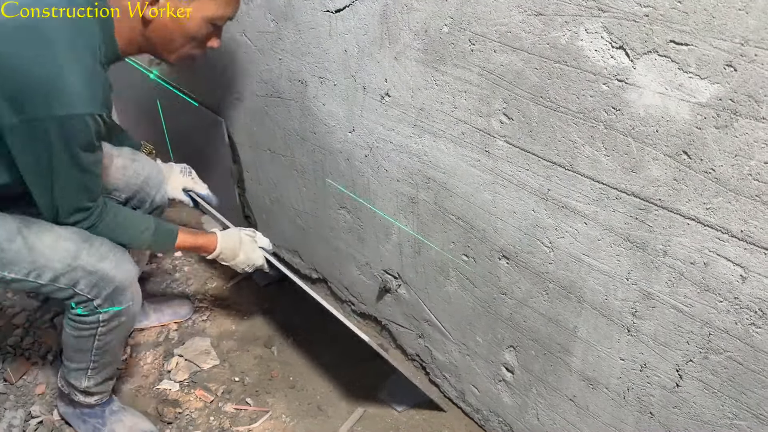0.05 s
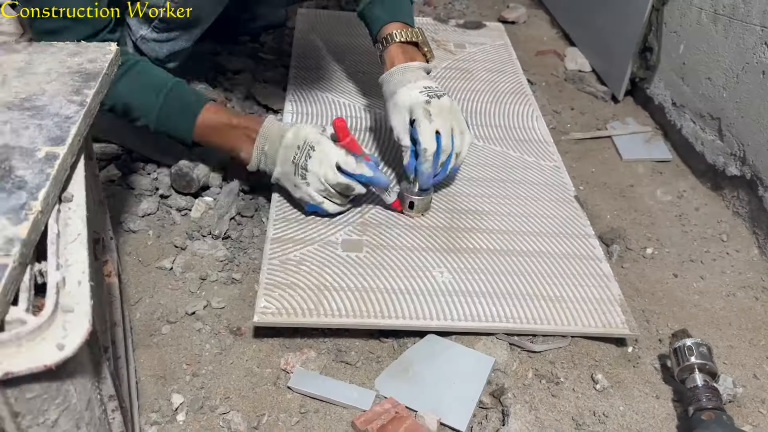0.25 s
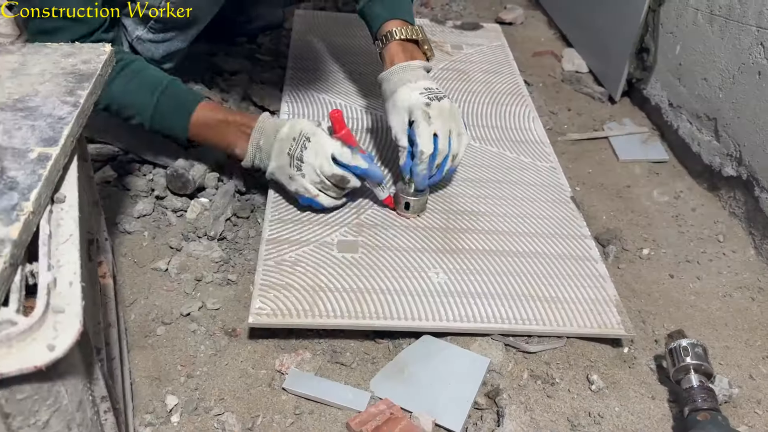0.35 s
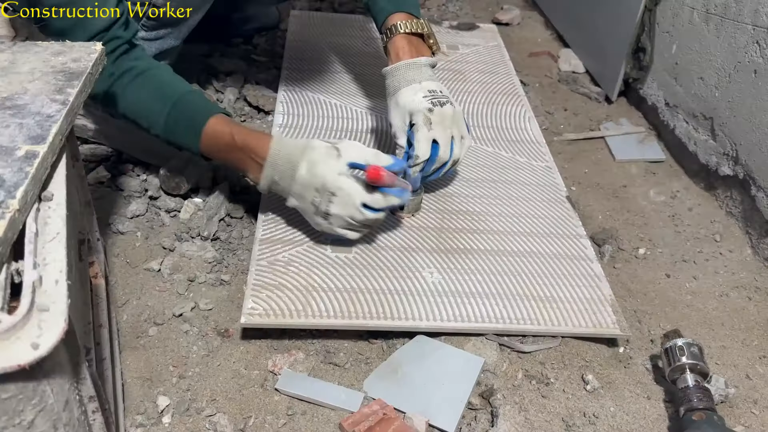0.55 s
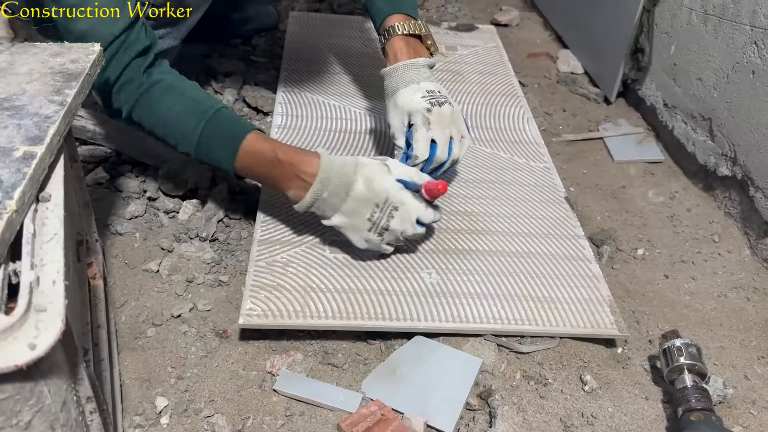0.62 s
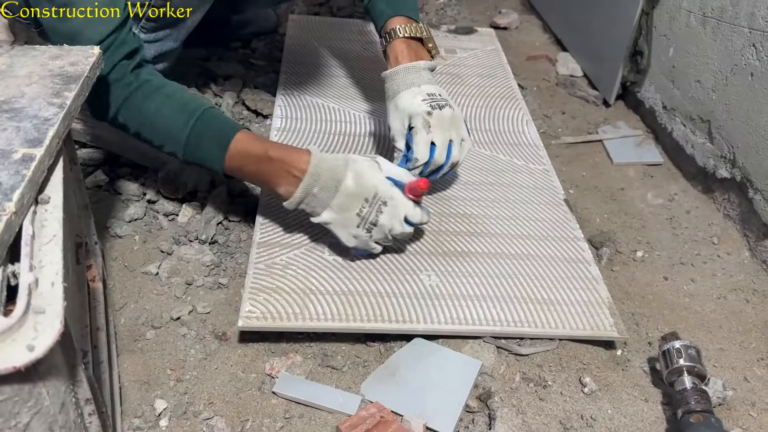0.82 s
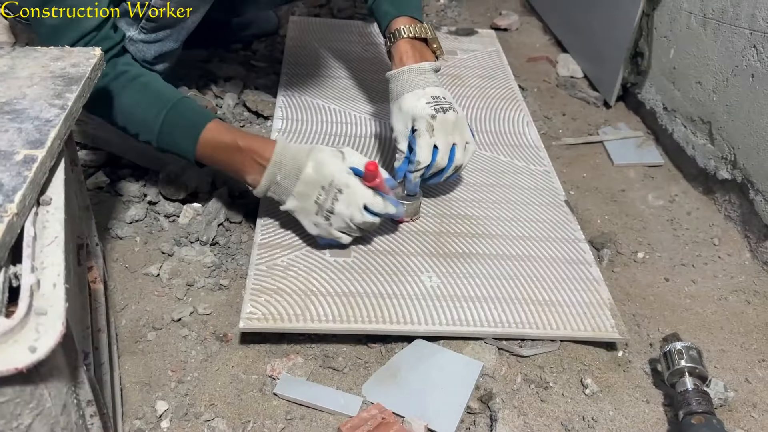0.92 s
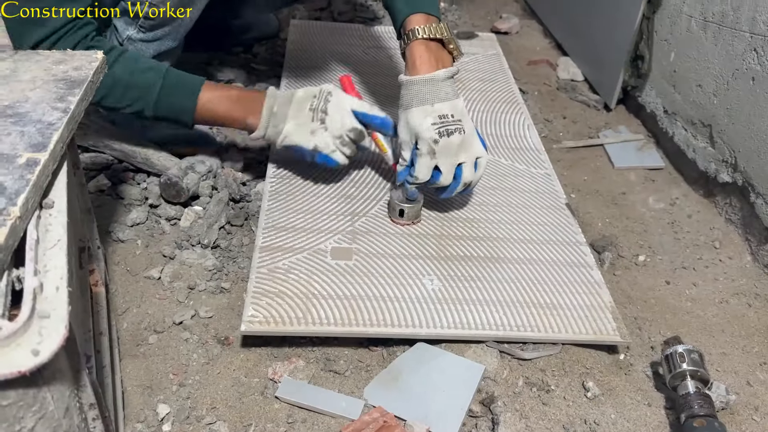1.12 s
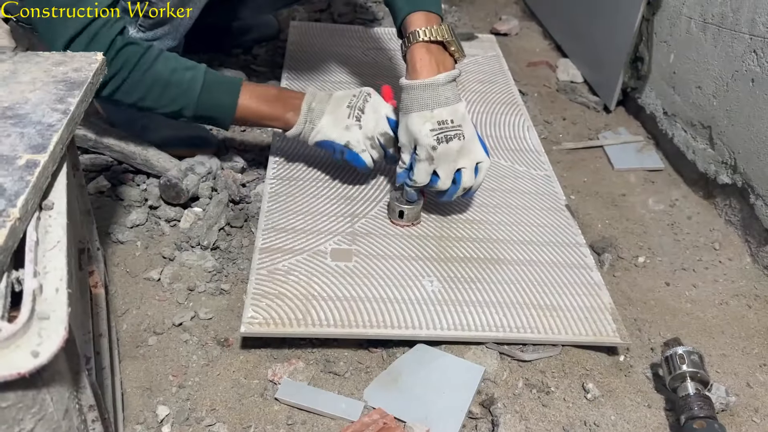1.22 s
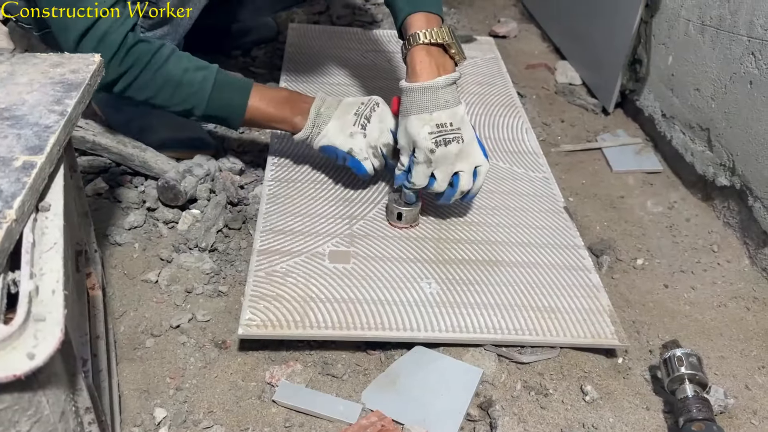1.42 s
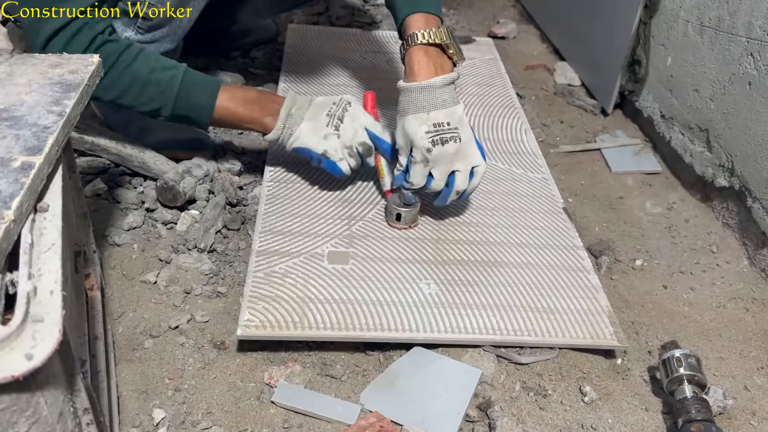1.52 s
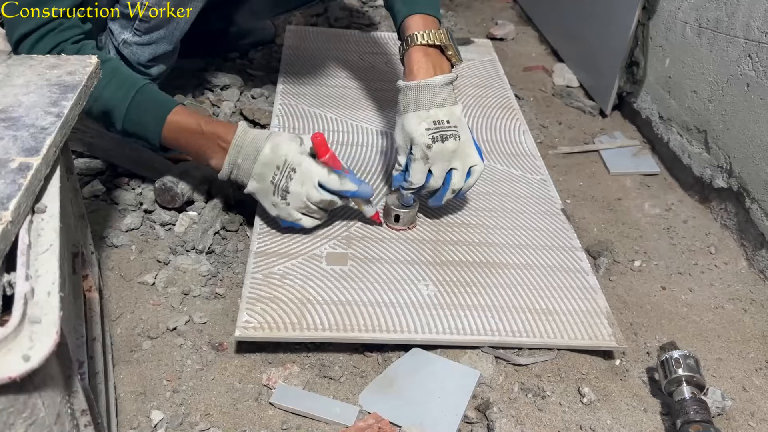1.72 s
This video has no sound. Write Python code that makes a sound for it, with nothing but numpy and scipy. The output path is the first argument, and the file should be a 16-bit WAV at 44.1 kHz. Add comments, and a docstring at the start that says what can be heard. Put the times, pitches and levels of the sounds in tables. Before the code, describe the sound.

A tile lands with a hollow knock, then a hand tool scratches it in squeaky strokes.

```python
"""Over the low rumble of a building site, a large ceramic tile slides on grit; at 0.2 s it is set down
on hard ground, and the impacts excite its normal modes in a hollow, ringing knock. A brief near-silence
follows. From 0.34 s a small hand tool is scraped over the lying tile: stick-slip friction rings tile
and tool, at times squeaking, and near concrete walls answer. Two hard strokes come at about 1.3 and
1.4 s, and a few light ones end the scene."""
import sys
import numpy as np
from scipy import signal
from scipy.fft import rfft, irfft, next_fast_len
from scipy.io import wavfile

SR = 44100
rng = np.random.default_rng(int(sys.argv[2]) if len(sys.argv) > 2 else 0)


def output_pcm(signal):
    """Save a mono or channel-first signal as 16-bit PCM at the path in sys.argv[1].

    Samples are clipped to [-1, 1] before scaling.
    """
    pcm = np.clip(np.atleast_2d(signal).T, -1, 1) * 32767
    wavfile.write(sys.argv[1], SR, np.round(pcm).astype(np.int16))


N = 77175

# Spectra below give relative level per unit bandwidth.
# spectra of the site's rumble and of its faint hush (f/Hz, level/dB)
RUMBLE_SPECTRUM = [(20, -17), (45, -5), (85, 0.5), (115, -1.5), (170, -17.5), (400, -31.5), (1500, -54)]
HUSH_SPECTRUM = [(30, -10), (230, 1), (450, -4), (900, -10.5), (1400, -10), (3000, -15), (6000, -23.5),
                 (9000, -39), (11000, -47), (15000, -45.5)]
# their envelopes; the rumble swells around the hard strokes (t/s, level/dB)
RUMBLE_ENVELOPE = [(0, -65), (.4, -56.5), (.48, -56.5), (.58, -58.5), (.67, -51.5), (.8, -64), (1.1, -60),
                   (1.3, -51.5), (1.38, -50.5), (1.435, -40.5), (1.5, -51.5), (1.56, -45.5), (1.61, -59.5),
                   (1.75, -72)]
HUSH_ENVELOPE = [(0, -60.5), (.35, -57.5), (.6, -64.5), (.95, -58), (1.1, -62.5), (1.22, -66.5), (1.4, -63),
                 (1.75, -57.5)]
# stereo width of the site: the rumble is more central than the hush (f/Hz, side gain/dB)
SITE_WIDTH = [(30, 0), (90, -6.5), (250, 0.5), (2000, -1.5)]
# spectrum of the grinding grit (f/Hz, level/dB)
GRIT_SPECTRUM = [(60, -15), (260, -5), (500, -7.5), (900, -6.5), (1400, 0), (2500, -4), (4000, -7),
                 (6300, -13), (8000, -24), (9300, -28), (11000, -30), (15000, -13.5)]
# envelope of the edge sliding over it (t/s, level/dB)
SLIDE_ENVELOPE = [(0, -49), (.04, -49), (.1, -53), (.155, -54.5), (.174, -45.5), (.192, -41), (.215, -40.5),
                  (.26, -56)]
# grains snapping under the edge (t/s, level/dB, f/Hz, bandwidth/Hz, T60/s)
GRIT_SNAPS = [(.169, -39, 3900, 500, 0.064), (0.1786, -42.5, 4000, 1500, .04),
              (0.185, -31.5, 1320, 350, 0.047), (0.197, -30.5, 3520, 1410, 0.056)]
# normal modes of the tile held on its edge (f/Hz, relative level/dB, T60/s)
TILE_MODES = [(203, -13, 0.49), (242.2, -3.5, 0.23), (287.3, -4, 0.29), (313, -4.5, .35), (386, 0.5, 0.18),
              (533.5, -0.5, 0.18), (626, 0, 0.35), (733, -8.5, .2), (776, -8, 0.11), (1148, 1, 0.11),
              (1316, -3.5, 0.16), (1379, 4.5, 0.1), (1527, -3.5, .15), (1853, -5.5, 0.17), (2286, -6, .12)]
# impacts as the edge lands and rocks (t/s, relative level/dB, cutoff f/Hz, crunch gain/dB)
IMPACTS = [(0.1983, -14.5, 5960, 12), (0.2051, -1.5, 1690, 0.5), (0.2145, -9.5, 1190, 6.5),
           (0.2454, -18.5, 804, 1)]
# spectrum of the crunch, the dense ringing of tile, ground and wall (f/Hz, level/dB)
CRUNCH_SPECTRUM = [(50, -21), (130, -10.5), (230, 1), (420, 3), (900, -6.5), (1350, 1), (1700, -7.5),
                   (2200, -2), (2600, -9), (4000, -12.5), (5200, -25.5), (8000, -40.5), (10500, -66)]
# its decay in overlapping bands (f/Hz, T60/s)
CRUNCH_DECAY = [(150, 0.36), (500, 0.28), (1500, 0.2), (4000, 0.13), (8000, 0.33)]
# the treble of slide and knock leans to the right (f/Hz, left minus right/dB)
LANDING_PAN = [(700, 0), (1300, -2), (4000, 0), (9000, -2.2)]
# normal modes of the lying tile and the tool on it (f/Hz, bandwidth/Hz, relative level/dB)
CONTACT_MODES = [(655, 43, -6.5), (1234, 47, 2.5), (1560, 130, -42), (2017, 72, 4.5), (2744, 68, 3.5),
                 (3055, 83, 2), (3596, 25, 4), (4210, 49, 3), (4650, 40, 1), (5330, 24, -3),
                 (5430, 110, -7), (5720, 70, -38), (6400, 50, -31), (7030, 42, -10)]
# spectrum of the broad rasp between those modes (f/Hz, level/dB)
RASP_SPECTRUM = [(100, -14), (280, -4.5), (520, -10.5), (800, -5), (1150, -1), (2000, -1), (3000, -0.5),
                 (4400, -3), (6000, -6.5), (7800, -22.5), (9200, -29), (10800, -61), (15000, -52)]
# strokes of the tool (t/s, rise/s, hold/s, release T60/s, level/dB, change over the hold/dB,
# ring gain/dB, bass gain/dB, treble gain/dB)
TOOL_STROKES = [(0.342, 0.0052, 0.023, 0.38, -44.5, -0.5, -0.5, -2, -13.5),
                (0.421, 0.0067, .006, 0.051, -52, 1, -30, 7, -13),
                (0.437, 0.035, 0.056, 0.9, -57.5, -7.5, -2, -13, -14),
                (0.626, 0.014, 0.082, 0.29, -44.5, -8, 0, -10.5, -6),
                (0.714, 0.037, 0.051, 0.14, -45, -3.5, 8.5, -15, -5.5),
                (0.795, 0.017, 0.038, .18, -46, -2.5, 2.5, 12, 10),
                (0.869, .01, .055, 0.25, -55.5, -2.5, -2, -1, -1),
                (0.982, 0.023, 0.027, 0.072, -52, -5.5, -5, 10, 8.5),
                (1.266, 0.012, 0.0048, .05, -54.5, 4.5, 9, 6, 5),
                (1.285, 0.0043, 0.037, 0.14, -29.5, -2.5, -3, -7.5, -0.5),
                (1.335, 0.0076, 0.0657, 0.12, -40.5, 7.5, 1.5, -3, -8),
                (1.412, 0.013, 0.018, 0.07, -27, 2.5, -5, -3, -5),
                (1.45, 0.022, 0.036, 0.46, -34, -6.5, -5.5, -4, -7.5),
                (1.578, 0.0089, 0.043, 0.057, -54, -7.5, -1, 5.5, -1),
                (1.649, 0.0049, 0.0044, 0.053, -48.5, -6.5, -2, 3, -6.5),
                (1.726, 0.019, .02, .2, -48, -6, -5, 0, 2)]
# squeaks of the tool (t/s, duration/s, f/Hz, level/dB)
TOOL_SQUEAKS = [(0.339, 0.043, 3077, -49), (0.43, 0.013, 1830, -43.5), (0.637, 0.046, 3060, -45.5),
                (0.645, 0.054, 1324, -51.5), (0.626, 0.12, 1590, -52), (0.684, 0.015, 2040, -46),
                (.748, .02, 2720, -46), (.745, 0.029, 3050, -57), (.746, 0.043, 5890, -46.5),
                (.748, 0.042, 7240, -56.5), (0.805, 0.05, 3640, -50), (0.834, 0.019, 4290, -45.5),
                (1.284, 0.055, 6350, -45.5), (1.298, 0.014, 3596, -35.5), (1.307, 0.032, 3052, -30.5),
                (1.307, 0.032, 641, -47.5), (1.329, .025, 2000, -38), (1.415, 0.052, 7330, -49.5),
                (1.429, 0.031, 1241, -36), (1.438, 0.0089, 4240, -32), (1.583, 0.02, 3055, -47.5),
                (1.648, 0.012, 1240, -49.5), (1.649, 0.0071, 2300, -48.5)]
# stereo width of the tool: light strokes are diffuse, hard ones focused (t/s, side gain/dB)
TOOL_WIDTH = [(.35, -1), (1.25, 0.5), (1.29, -31.5), (1.46, -5.5), (1.6, 1), (1.75, 0.5)]
# treble loss of the whole sound (f/Hz, gain/dB)
TREBLE_ROLLOFF = [(8000, 0), (9200, -3.5), (10500, -16), (15000, -13.5)]

KNOCK_DB, CRUNCH_DB, IMPACT_RISE_S = -21.5, 3.5, 0.0015
SLIPS_PER_S, SLIP_SPREAD_DB, CHATTER_DB, CHATTER_PER_S = 5000, 2.5, 2.17, 170
MODE_DRIFT_DB, MODE_DRIFT_PER_S = 4.5, 30
BASS_HZ, TREBLE_HZ = 920, 4000
SQUEAK_WAVER, SQUEAK_ROUGH_DB, SQUEAK_JITTER_PER_S = 0.016, 2.8, 450
GAP_START_S, GAP_END_S, GAP_DB, FADE_OUT_S, FADE_IN_S = 0.3195, 0.344, -13.5, 0.015, 0.00081
t = np.arange(N) / SR


def undb(db):
    """Amplitude ratio of a level in decibels."""
    return 10 ** (np.asarray(db) / 20)


def unit(x):
    """Normalisation to an rms of 1."""
    return x / np.sqrt(np.mean(x ** 2))


def envelope(points):
    """Gain interpolated through (t/s, level/dB) points."""
    return undb(np.interp(t, *np.array(points).T))


def by_pitch(f, points):
    """Interpolation of (f/Hz, value) points on a logarithmic frequency axis."""
    hz, values = np.array(points).T
    return np.interp(np.log(f + 1), np.log(hz), values)


def shape(x, response):
    """Linear filtering: the spectrum is multiplied by a frequency response."""
    size = next_fast_len(2 * N)
    f = np.arange(size // 2 + 1) * SR / size
    return irfft(rfft(x, size) * response(f), size)[:N]


def colour(x, points):
    """Spectral weighting by (f/Hz, gain/dB) points."""
    return shape(x, lambda f: undb(by_pitch(f, points)))


def below(f, corner_hz):
    """Low-pass weight, falling smoothly from 1 to 0 around the corner."""
    return 1 / (1 + (f / corner_hz) ** 4)


def resonate(x, hz, width):
    """Forced response of a damped resonator with unit gain at its centre."""
    return signal.lfilter(*signal.iirpeak(hz, hz / width, fs=SR), x)


def decay(age, t60):
    """Exponential damping from age 0, by 60 dB in each t60."""
    return np.exp(-np.log(1000) * np.maximum(age, 0) / t60)


def wander(rate):
    """Random modulation: linear interpolation of Gaussian values, rate of them a second."""
    knots = rng.standard_normal(N // 10)
    return np.interp(t * rate, np.arange(len(knots)), knots)


def stereo(mid, side, pan_db=0):
    """Sum and difference of mid and side give left and right."""
    return np.array([(mid + side) * undb(pan_db / 2), (mid - side) * undb(-pan_db / 2)])


def building_site():
    """Superposition of two independent noises: a low rumble and a faint hush."""
    rumble = unit(colour(rng.standard_normal(N), RUMBLE_SPECTRUM)) * envelope(RUMBLE_ENVELOPE)
    hush = unit(colour(rng.standard_normal(N), HUSH_SPECTRUM)) * envelope(HUSH_ENVELOPE)
    return rumble + hush


def stick_slip():
    """Stick-slip friction: a Poisson train of uneven clicks, amplitude-modulated by chatter."""
    slips = rng.random(N) < SLIPS_PER_S / SR
    size = undb(SLIP_SPREAD_DB * np.minimum(rng.exponential(size=N), 4))
    polarity = np.sign(rng.standard_normal(N))
    chatter = undb(CHATTER_DB * wander(CHATTER_PER_S))
    return unit(slips * size * polarity * chatter)


def tile_slide():
    """Sliding friction grinds the grit; under load a few grains fracture in damped bursts of noise."""
    out = unit(colour(stick_slip(), GRIT_SPECTRUM)) * envelope(SLIDE_ENVELOPE)
    for start, db, hz, width, t60 in GRIT_SNAPS:
        band = resonate(rng.standard_normal(N), hz, width)
        grain = unit(resonate(band, hz, width))
        attack = np.clip((t - start) / 0.001, 0, 1)
        out += undb(db) * grain * attack * decay(t - start, t60)
    return out


def crunch(age, contact_response):
    """Modal overlap: modes too dense to resolve ring as noise, each band with its own damping."""
    noise = unit(colour(rng.standard_normal(N), CRUNCH_SPECTRUM))
    out = 0
    for band_hz, t60 in CRUNCH_DECAY:
        share = [(hz, float(hz == band_hz)) for hz, _ in CRUNCH_DECAY]
        band = shape(noise, lambda f: contact_response(f) * by_pitch(f, share))
        out += band * decay(age, t60)
    return out


def tile_knock():
    """Impact excitation: each blow feeds the tile's modes; a softer contact excites less treble."""
    modes = [(np.sin(2 * np.pi * (hz * t + rng.random())), hz, db, t60) for hz, db, t60 in TILE_MODES]
    out = 0
    for start, impact_db, cutoff_hz, crunch_db in IMPACTS:
        age = np.maximum(t - start, 0)
        contact = lambda f: 1 / np.hypot(1, f / cutoff_hz)
        ring = sum(undb(db) * contact(hz) * tone * decay(age, t60) for tone, hz, db, t60 in modes)
        dense = undb(CRUNCH_DB + crunch_db) * crunch(age, contact)
        attack = 1 - np.exp(-age / IMPACT_RISE_S)
        out += undb(impact_db) * (ring + dense) * attack
    return undb(KNOCK_DB) * out


def tile_landing(radiates_above_hz=126):
    """Radiation from one place: slide and knock share a direction; the thin slab radiates little bass."""
    radiation = signal.butter(2, radiates_above_hz, "highpass", fs=SR, output="sos")
    mono = tile_slide() + signal.sosfilt(radiation, tile_knock())
    return np.array([shape(mono, lambda f: undb(sign * by_pitch(f, LANDING_PAN) / 2))
                     for sign in (1, -1)])


def tool_squeaks():
    """Self-excited oscillation: slipping locks on to one resonance. The rough tones are complex-valued."""
    out = 0
    for start, duration, hz, db in TOOL_SQUEAKS:
        progress = np.clip((t - start) / duration, 0, 1)
        swell = np.sqrt(np.abs(np.sin(np.pi * progress)))
        pitch = hz * (1 + SQUEAK_WAVER * wander(SQUEAK_JITTER_PER_S))
        phase = 2 * np.pi * np.cumsum(pitch) / SR
        amplitude = np.sqrt(2) * undb(db + SQUEAK_ROUGH_DB * wander(SQUEAK_JITTER_PER_S))
        out += amplitude * swell * np.exp(1j * phase)
    return out


def tool_strokes():
    """Forced vibration: stick-slip drives the modes and a broad rasp, coloured by each stroke's contact."""
    clicks = stick_slip()
    ring = unit(sum(undb(db + MODE_DRIFT_DB * wander(MODE_DRIFT_PER_S)) * resonate(clicks, hz, width)
                    for hz, width, db in CONTACT_MODES))
    rasp = unit(colour(stick_slip(), RASP_SPECTRUM))
    out = 0
    for start, rise, hold, release, db, change_db, ring_db, bass_db, treble_db in TOOL_STROKES:
        age = t - start
        attack = np.clip(age / rise, 0, 1)
        progress = np.clip((age - rise) / hold, 0, 1)
        force = attack * undb(db + change_db * progress) * decay(age - rise - hold, release)
        shelves = lambda f: undb(bass_db * below(f, BASS_HZ) + treble_db * (1 - below(f, TREBLE_HZ)))
        out += force * unit(shape(rasp + undb(ring_db) * ring, shelves))
    return out


def walls(x, tail_db=-11, t60_s=0.39, delay_s=0.008):
    """Reverberation: dense reflections from the near concrete follow the direct sound."""
    tail = rng.standard_normal(N) * decay(t, t60_s) * (t > delay_s)
    return x + undb(tail_db) * signal.fftconvolve(x, tail / np.linalg.norm(tail))[:N]


def tool_scraping():
    """Decorrelation, as by reflections: strokes differ left and right, and squeaks are out of phase."""
    squeaks = tool_squeaks()
    mid = walls(tool_strokes()) + squeaks.real
    side = walls(tool_strokes()) + squeaks.imag
    return stereo(mid, side * envelope(TOOL_WIDTH), pan_db=-0.5)


def scene():
    """Superposition: the tile lands, a brief gap cuts its ring, then the site widens and the tool works."""
    before = np.clip((GAP_START_S - t) / FADE_OUT_S, 0, 1)
    after = np.clip((t - GAP_END_S) / FADE_IN_S, 0, 1)
    outside_gap = before + after
    site_mid = building_site() * (outside_gap + undb(GAP_DB) * (1 - outside_gap))
    site_side = colour(building_site(), SITE_WIDTH) * after
    return tile_landing() * before + tool_scraping() * after + stereo(site_mid, site_side)


def record(dry, ceiling=0.48, cutoff_hz=15700):
    """Soft saturation rounds the loudest peaks; low-pass filtering then dulls and cuts the top."""
    rounded = dry / (1 + (dry / ceiling) ** 4) ** (1 / 4)
    dulled = np.array([colour(channel, TREBLE_ROLLOFF) for channel in rounded])
    lowpass = signal.ellip(8, 0.2, 70, cutoff_hz, fs=SR, output="sos")
    return signal.sosfilt(lowpass, dulled)


dry = scene()
out = record(dry)
output_pcm(out)
```